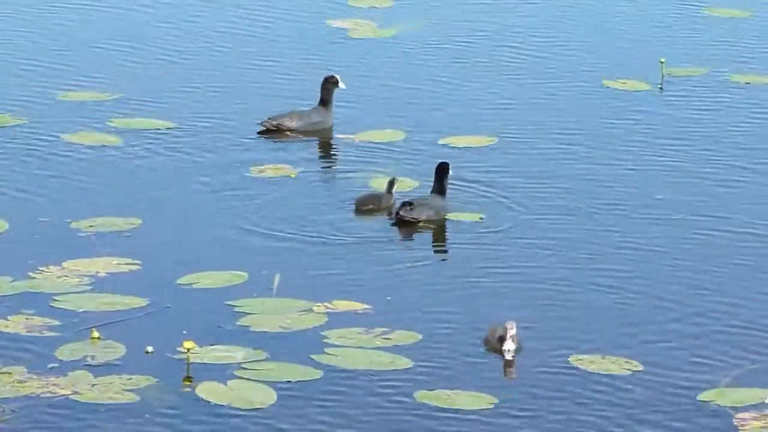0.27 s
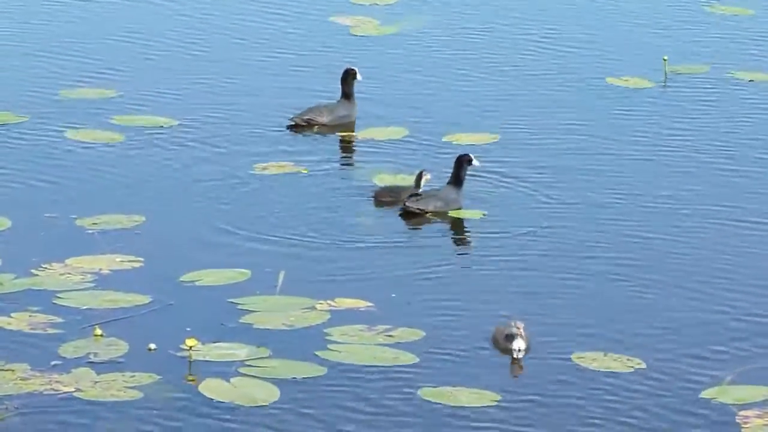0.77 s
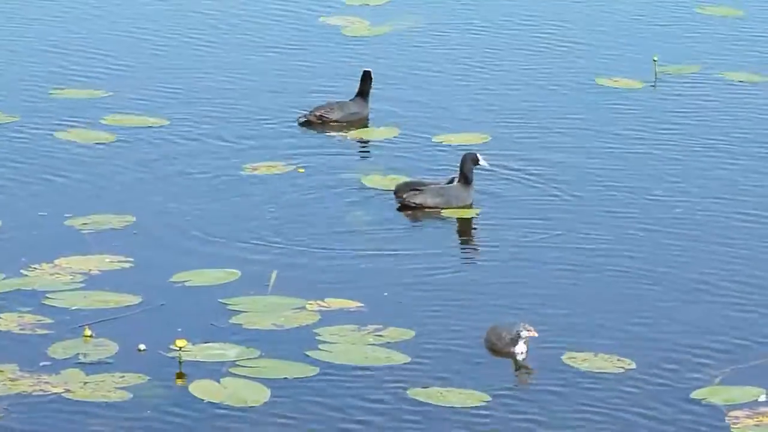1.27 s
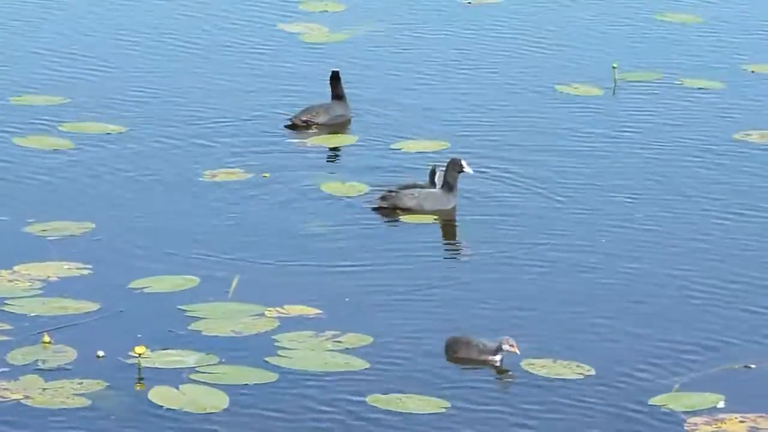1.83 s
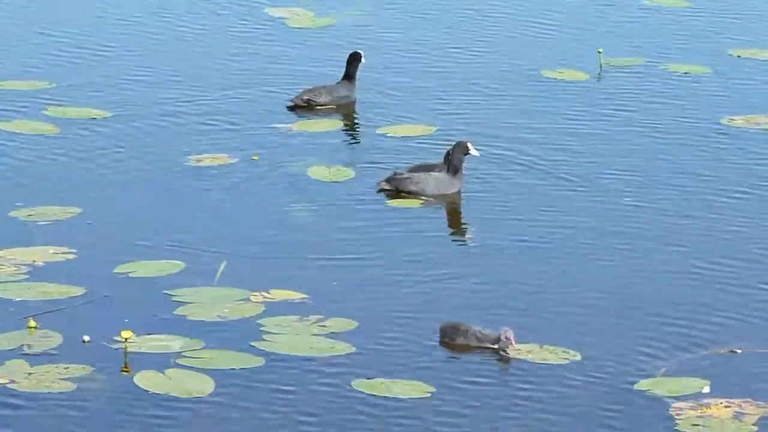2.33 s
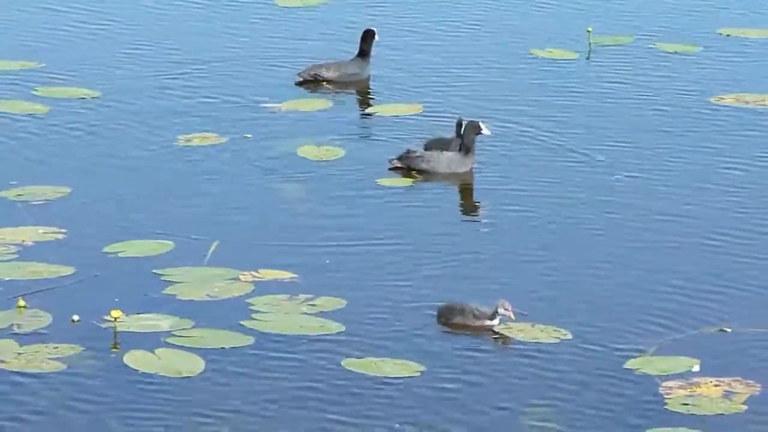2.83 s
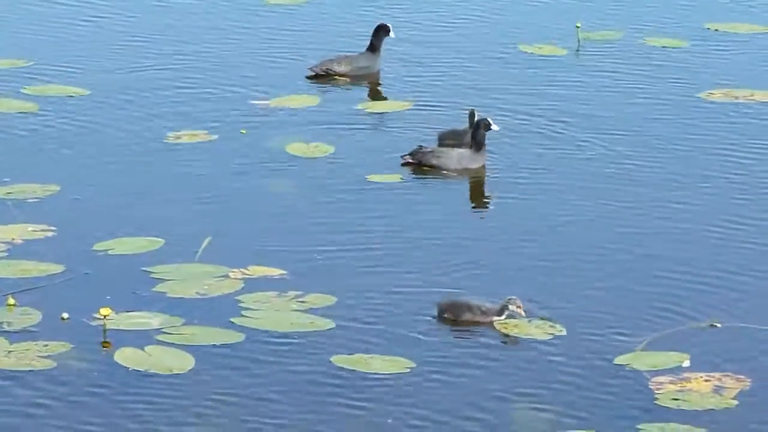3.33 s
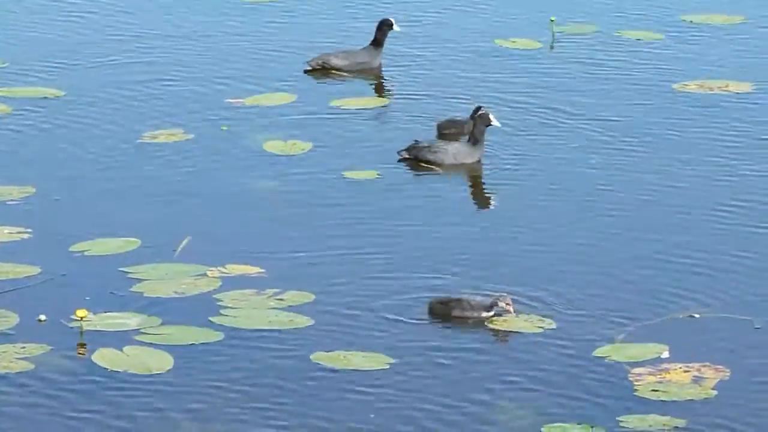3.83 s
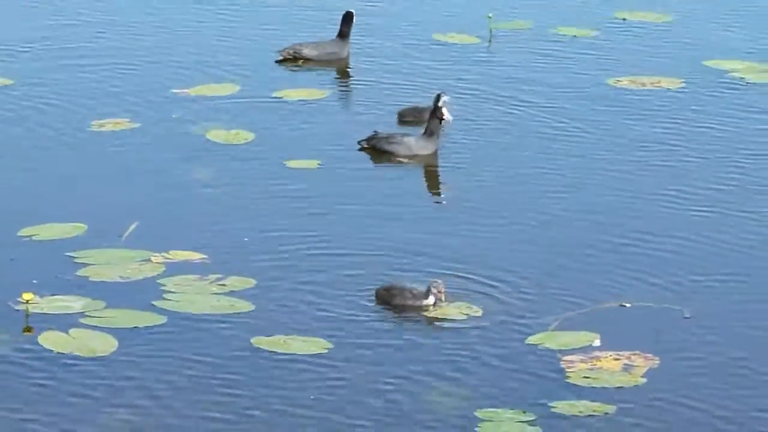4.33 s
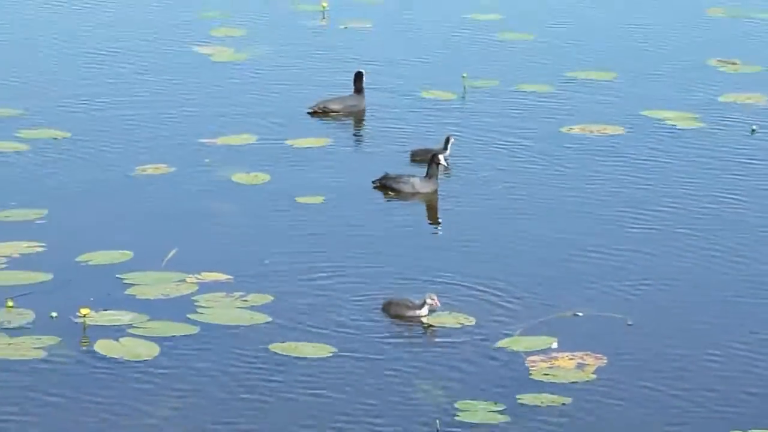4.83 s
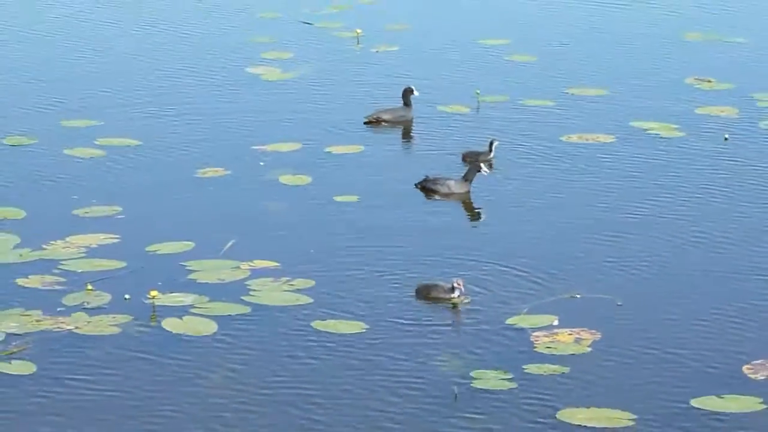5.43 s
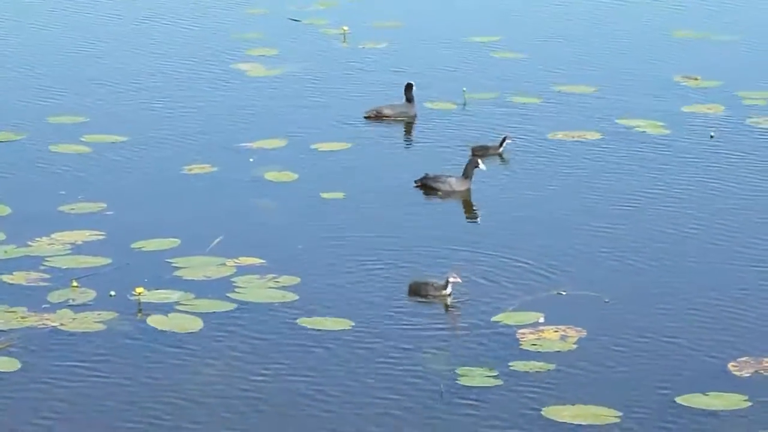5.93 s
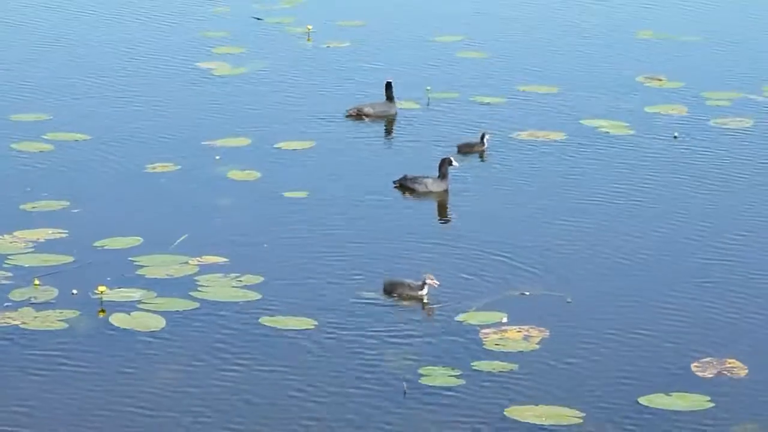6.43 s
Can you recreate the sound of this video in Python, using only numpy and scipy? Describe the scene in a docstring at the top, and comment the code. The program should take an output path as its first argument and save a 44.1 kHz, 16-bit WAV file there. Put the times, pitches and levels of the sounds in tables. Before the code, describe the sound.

Coot chicks beg in thin sliding whistles that break into falling peeps, an adult pips sharply, and wind buffets the microphone over a quiet lake.

```python
"""A family of coots on a lake: an adult gives four sharp pips, octave tones turning brassy, and a faint, pure fifth.
The chicks beg in thin, sliding whistles that break into falling peeps, with faint arched whistles between;
a small songbird nearer the shore chirps once. Gusts and single eddies, shaped noise and short thumps,
buffet the microphone ports at the start and the end. The camera ticks and knocks in the hand as resonant bursts,
and its zoom motor whirs for a second in clicks and rasp. A far engine drones over low rumble and soft hiss."""
import sys
import numpy as np
from scipy import signal
from scipy.fft import rfft, irfft, next_fast_len
from scipy.io import wavfile
from scipy.ndimage import map_coordinates

SR = 44100
rng = np.random.default_rng(int(sys.argv[2]) if len(sys.argv) > 2 else 0)


def dump_mix(stems):
    """Bounce the given channels to the path in sys.argv[1] as a 16-bit WAV at rate SR."""
    frames = np.atleast_2d(stems).T  # one column per channel
    limited = np.clip(frames, -1, 1)  # hard clip at full scale
    pcm = np.round(limited * 32767).astype(np.int16)
    wavfile.write(sys.argv[1], SR, pcm)


N = 295166
TIME = np.arange(N) / SR

# Adult pips. Each row: start in seconds, length in seconds, pitch in Hz, upper voice in dB, lower voice in dB,
# lower voice's entry in seconds, its pitch lift in Hz, upper voice's octave in dB, brightness above the third in dB.
ADULT_PIPS = [(1.691, 0.096, 804, -37, -49, 0.041, -4.5, -13, 1),
              (3.19, 0.082, 791.7, -32.5, -35.5, 0.019, 34.5, -3, -0.5),
              (4.585, 0.097, 791.7, -36, -39, 0.027, 33.5, -5.5, 0),
              (5.44, 0.11, 786, -35, -39, 0.031, 22, 5.5, -4),
              (6.15, 0.055, 805, -54.5, -101, .01, -3.5, -14, -6)]
# Partials of the adult's two voices. Each row: multiple of the pitch, relative level in dB.
UPPER_PARTIALS = [(2, 2), (4, -7), (6, -26), (8, -21.5)]
LOWER_PARTIALS = [(1, -0.5), (3, 0), (4, -11.5), (5, -27), (6, -23.5), (7, -16.5), (8, -11), (9, -12.5)]
PIP_ATTACK_S, PIP_RELEASE_S, PIP_DROOP_HZ = 0.028, 0.039, 13  # the pitch droops as the pip closes
YIELD_DB = -43.5  # above this level the lower voice takes the drive from the upper one
JOIN_S, LOWER_SAG_DB_PER_S = 0.018, 85.5  # the lower voice swells, then sags
LOWER_RELEASE_S, LOWER_STOPS_EARLY_S = 0.028, 0.0063  # and stops before the upper one
LOWER_STIR_DB = -20.5  # the lower voice stirs faintly before it locks in
OCTAVE_SAG_DB_PER_S = 128  # the upper voice mellows as the pip goes on

# Chick calls, a thin whistle that breaks into a falling peep. Each row: start, whistle, climb, break, fall and
# tail in seconds, scoop 0-1, whistle from Hz, to Hz, peep in Hz, bend of the fall (1 is straight), tail's end in Hz,
# bend of the tail, whistle in dB, its swell in dB, its overtone in dB, peep in dB, peep's end in dB, tail's rasp 0-1.
BEGGING_CALLS = [(0, .298, .19, .01, .084, .03, .75, 3540, 3730, 3490, 2.8, 2220, 2, -45.5, 11, -30, -45.3, -47.5, .2),
                 (1.969, .289, .115, .02, .049, .029, .95, 3510, 4200, 3680, 1, 2020, 1.3, -42.5, 4, -36, -41, -43.5, .08),
                 (4.732, .113, .1, .011, .064, .027, 0, 4420, 4600, 4050, 5, 2300, 3, -51, 1.5, -30, -31.3, -36.5, .24),
                 (6.183, .275, .16, .004, .105, .036, .6, 3310, 3470, 3930, 2.9, 2340, 3.2, -58, 7, -12, -34.8, -49.5, .42)]
# A second voice cuts in, beats with the first and roughens it. Each row: start in seconds, length in seconds,
# from Hz, to Hz, from dB, to dB, added rasp 0-1, first voice's loss in dB, first voice's drop in Hz.
SECOND_VOICES = [(0.19, 0.11, 1834, 1872, -61.5, -55.5, 0.1, 1.5, -0.5),
                 (0.294, 0.064, 1829, 1903, -52.5, -57, 0.45, -0.5, 2.5),
                 (2.191, 0.055, 2090, 2130, -59, -66, 0.18, 7, 1.5),
                 (4.884, 0.032, 3150, 2852, -34.5, -40.5, 0.23, 2, 90.5),
                 (6.492, 0.068, 2735, 3000, -63, -50, 0.22, 3.5, 0.5)]
SCOOP, SCOOP_S = 0.36, 0.017  # a whistle at full scoop starts flat by about this share and slides up
OVERSHOOT, OVERSHOOT_AT_S, OVERSHOOT_S = 0.11, 0.0302, 0.035  # then overshoots before it settles
SCOOP_DB = 27  # level lost per share of pitch while the whistle is still flat
CLIMB_ENDS, SWELL_ENDS = 0.845, 0.75  # shares of the whistle after which pitch and level have settled
JUMP_S = 0.0055  # the level jumps as soon as the voice begins to break
THROAT_HZ, THROAT_WIDTH_HZ, FLARE_DB = 3093, 59, 7.5  # the falling peep flares at the throat's resonance
TAIL_LOSS_DB = 6  # the voice weakens as it slips off that resonance
PEEP_OVERTONE_DB, TAIL_OVERTONE_DB = -27.5, -10.5
CHICK_ATTACK_S, CHICK_RELEASE_S = 0.0064, 0.009
CALM_RASP = 0.042  # of one voice alone
BEAT = 0.13  # depth to which the second voice modulates the first
WAVER_DB, WAVER, WAVER_RATE = 1.3, 0.003, 55  # level, share of pitch, knots a second
SPUTTER_DB = 3.5  # scale of the uneven spurts at full rasp

# Faint arched whistles between the calls. Each row: start in seconds, length in seconds, crest after seconds,
# from Hz, crest in Hz, to Hz, level in dB, overtone in dB.
ARCHED_WHISTLES = [(0.397, .112, .042, 2850, 3260, 2600, -59.5, -22),
                   (2.426, .192, .132, 2810, 3190, 2770, -65, -18),
                   (3.04, 0.064, 0.041, 3130, 3210, 3110, -62.5, -19),
                   (4.459, .265, 0.187, 2834, 2993, 2720, -54, -20.5),
                   (6.587, 0.16, .12, 2590, 2846, 2800, -63, -9)]
FALTER_DB, FALTER_RATE = 2.5, 90  # uneven level, knots a second
# A small songbird's high two-step chirp from nearer the shore. Each row: time in seconds, pitch in Hz, level in dB.
SONGBIRD_PATH = [(1.205, 5800, -59), (1.211, 5510, -38), (1.222, 5430, -32), (1.225, 4930, -35.5),
                 (1.244, 4950, -33.5), (1.252, 4910, -37.5), (1.259, 4720, -41.5), (1.264, 4550, -65)]

# Decay of the shore's answer. Each row: frequency in Hz, t60 in seconds.
SHORE_DECAY = [(500, 0.21), (1600, .3), (2400, 0.42), (3500, .47), (5000, 0.49), (10000, 0.17)]
# Colour of the shore's answer. Each row: frequency in Hz, gain in dB.
SHORE_COLOUR = [(800, 5), (1600, -2), (2400, 1.5), (3200, 0), (5500, -11), (9000, -13)]

# Gusts of wind. Each row: start in seconds, hold in seconds, dying time in seconds, relative level in dB,
# left over right in dB, extra deep buffeting in dB.
WIND_GUSTS = [(-.025, .14, 0.043, -31, 6.5, 0.5), (0.17, 0.13, 0.19, -24.5, 0, -1.5),
              (0.707, 0.13, 0.044, -37.5, -0.5, 2.5), (0.866, 0.21, 0.073, -30.5, -3.5, -0.5),
              (1.194, 0.071, 0.023, -32.5, -13, -1.5), (1.573, 0.11, 0.038, -46.5, 6, -3),
              (5.111, 0.077, 0.17, -37.5, -1, 1.5), (5.469, 0.083, 0.035, -38.5, -9.5, 2.5),
              (6.186, 0.32, 0.031, -24.5, 1.5, -2.5), (6.577, 0.034, 0.087, -26, -0.5, -2.5)]
GUST_RISE_S = 0.045
# Deep buffeting, then the finer swirl of strong puffs. Each row: frequency in Hz, relative density in dB.
BUFFET_SPECTRUM = [(15, -18.5), (30, -7), (80, 2), (150, -1), (220, -7), (320, -47), (500, -41),
                   (1200, -63), (2500, -120)]
SWIRL_SPECTRUM = [(60, -33.5), (170, 5), (270, 9.5), (370, 0.5), (520, -22), (900, -26), (2000, -66),
                  (4000, -120)]
# The strongest eddies on the ports. Each row: centre in seconds, level in dB, pitch in Hz, left over right in dB.
PORT_EDDIES = [(.081, -19, 144, 2), (0.107, -17, 156, 9), (0.222, -12.5, 184, 5), (0.246, -16, 175, 2),
               (0.29, -22.5, 250, -5.5), (0.314, -21.5, 130, -5), (0.429, -18, 129, -0.5),
               (0.937, -9.5, 178, 9), (0.975, -19.5, 174, 7), (1.062, -23, 74, -13), (1.25, -20.5, 143, -8),
               (1.625, -30, 59, 3), (6.179, -20, 165, 6), (6.246, -16.5, 207, 5.5), (6.349, -12.5, 181, -3),
               (6.486, -13.5, 215, 2), (6.499, -13.5, 99, 2), (6.607, -13.5, 142, 12),
               (6.635, -19.5, 186, -0.5)]

# Zoom motor. Each row: time in seconds, gear rate in Hz, relative level in dB.
ZOOM_RUN = [(4.31, 106.4, -78), (4.325, 102.5, -58), (4.9, 103, -57.5), (5.285, 100.7, -58.5),
            (5.31, 100.7, -86)]
# Rasp of the gears. Each row: frequency in Hz, relative density in dB.
GEAR_SPECTRUM = [(600, -28), (1500, -12), (2400, -1), (3150, 6.5), (4000, 1.5), (5200, 0.5), (6200, -13),
                 (9000, -18)]
# What a gear click rings with. Each row: frequency in Hz, relative level in dB, t60 in seconds.
LENS_RINGS = [(2330, -11, 0.01), (3320, 2, 0.0048), (4500, -7, .004), (6200, -17, 0.0067)]
# Camera ticks and knocks; the first row is a wind eddy's sharp edge. Each row: start in seconds,
# relative level in dB, centre in Hz, t60 in seconds.
TICKS_AND_KNOCKS = [(0.933, -31, 450, 0.039), (3.369, -34, 2110, .022), (3.498, -30, 2850, 0.016),
                    (3.894, -33.5, 985, .03), (4.034, -36, 1100, 0.033), (4.344, -26, 2620, .014),
                    (4.402, -32, 1170, .018), (4.713, -31.5, 1280, 0.025), (4.980, -34, 1800, 0.011),
                    (5.003, -34.5, 5187, 0.014), (5.829, -32.5, 1810, 0.018), (6.481, -27.5, 650, .033),
                    (6.490, -18, 504, .033), (6.497, -22, 445, 0.025), (6.603, -22, 493, 0.033)]

# Far engine. Each row: time in seconds, firing rate in Hz, relative level in dB.
ENGINE_DRONE = [(0, 98, -85.5), (2, 97.6, -58.5), (3.3, 97.28, -50), (4.2, 96.74, -46), (5.2, 97.25, -52),
                (6.69, 96.18, -40)]
# Harmonics of the engine. Each row: multiple of the firing rate, relative level in dB.
FIRING_HARMONICS = [(1, 0), (2, 3.5), (3, -9), (4, -14.5)]
# Background level. Each row: time in seconds, far rumble in relative dB, hiss in relative dB.
AIR_LEVELS = [(0, -53, -62), (2.5, -53.5, -62.5), (3.8, -52.5, -62), (5, -55.5, -62), (6.4, -52.5, -62.5),
              (6.69, -56.5, -65.5)]
# Far rumble, then soft hiss. Each row: frequency in Hz, relative density in dB.
RUMBLE_SPECTRUM = [(15, -53.5), (25, -20), (65, -14), (81, -4.5), (97, -0.5), (159, -13.5), (175, -13.5),
                   (191, -3.5), (257, -11.5), (297, -11), (515, -17), (2000, -30.5), (2600, -38.5),
                   (4400, -120)]
HISS_SPECTRUM = [(700, -18), (1500, -9.5), (2500, -1), (4000, -1.5), (5500, -3), (7000, -9.5), (9500, -6.5)]
# Stereo width of rumble and hiss. Each row: frequency in Hz, side over mid in dB.
BACKGROUND_WIDTH = [(60, -12), (170, -11.5), (290, -6.5), (490, 1.5), (820, 5.5), (1400, 8.5), (2400, 9),
                    (4000, 6), (6700, 0.5)]

# Treble response of the microphone. Each row: frequency in Hz, gain in dB.
MICROPHONE_RESPONSE = [(7000, 0.5), (7500, -9.5), (7750, -17.5), (8000, -57.5)]
# Image of the treble above half the sampling rate. Each row: frequency in Hz, gain in dB.
MIRROR_RESPONSE = [(8300, -3), (8700, -10.5), (9500, -24.5), (10000, -38.5)]
SAMPLER_HZ, TOP_HZ = 16000, 10050  # the camera's own sampling rate and band limit


def adult(jitter=0.0023, shimmer_db=1.0, bloom=0.16):
    """A pip starts as a pure octave; a lower voice, where strong, locks in under it and makes it brassy."""
    out = np.zeros(N)
    for s, length, hz, upper_db, lower_db, joins, lift_hz, octave_db, bright_db in ADULT_PIPS:
        span, t = during(s, length)
        n = len(span)
        closing = ramp((length - t) / PIP_RELEASE_S)
        stir = amp(LOWER_STIR_DB) * ramp(t / joins)
        locked = np.maximum(ramp((t - joins) / JOIN_S), stir)
        sag = amp(-LOWER_SAG_DB_PER_S * (t - joins))
        lower = locked * sag * ramp((length - LOWER_STOPS_EARLY_S - t) / LOWER_RELEASE_S)
        yielding = np.hypot(1, lower * amp(lower_db - YIELD_DB))
        upper = ramp(t / PIP_ATTACK_S) * closing / yielding
        pitch = hz + lift_hz * lower - PIP_DROOP_HZ * (1 - closing)
        phase = cycle(pitch * (1 + jitter * wobble(400, size=n)))
        mellowing_db = octave_db - OCTAVE_SAG_DB_PER_S * t
        voices = [(upper, upper_db, UPPER_PARTIALS, np.sin, mellowing_db),
                  (lower, lower_db, LOWER_PARTIALS, np.cos, 0)]
        for effort, level_db, partials, wave, fourth_db in voices:
            for k, db in partials:
                high = k > 3
                # the higher overtones bloom only at full effort
                colour = amp(fourth_db * (k == 4) + bright_db * high) * effort ** (bloom * high)
                level = amp(level_db + db + shimmer_db * wobble(141, size=n))
                out[span] += np.sqrt(2) * effort * colour * level * wave(k * phase)
    return out


def second_voice():
    """A chick's second voice, with the strain, loss, drop and beating it imposes on the first."""
    out, strain = np.zeros(N), np.full(N, CALM_RASP)
    loss_db, drop_hz, second_hz, coupling = np.zeros((4, N))
    for s, length, from_hz, to_hz, from_db, to_db, rasp, takes_db, drags_hz in SECOND_VOICES:
        span, t = during(s, length)
        gate, u = chick_gate(t, length), t / length
        strain[span] += rasp * gate
        loss_db[span] += takes_db * gate
        drop_hz[span] += drags_hz * gate
        coupling[span] += BEAT * gate
        second_hz[span] = from_hz + (to_hz - from_hz) * u
        gain = gate * amp(from_db + (to_db - from_db) * u)
        out[span] += whistle(second_hz[span], gain, strain[span], PEEP_OVERTONE_DB)
    return out, strain, loss_db, drop_hz, second_hz, coupling


def chicks():
    """Each call climbs and swells, then breaks into a peep that falls, flares and frays, roughened by a second voice."""
    out, strain, loss_db, drop_hz, second_hz, coupling = second_voice()
    for (s, whistle_s, climb_s, break_s, fall_s, tail_s, scoop, from_hz, to_hz, peep_hz, bend, tail_hz,
         tail_bend, whistle_db, swell_db, overtone_db, peep_db, end_db, tail_rasp) in BEGGING_CALLS:
        length = whistle_s + fall_s + tail_s
        span, t = during(s, length)
        swell = ramp(t / whistle_s / SWELL_ENDS)
        fall = np.clip((t - whistle_s) / fall_s, 0, 1)
        slip = 1 - np.clip((length - t) / tail_s, 0, 1) ** tail_bend

        # pitch: scoop, overshoot and climb, then the break into the falling peep
        climb = ramp(1 + (t - CLIMB_ENDS * whistle_s) / climb_s)
        overshoot = OVERSHOOT * np.exp(-((t - OVERSHOOT_AT_S) / OVERSHOOT_S) ** 2)
        settle = overshoot - SCOOP * np.exp(-(t / SCOOP_S) ** 2)
        whistled = (from_hz + (to_hz - from_hz) * climb) * (1 + scoop * settle)
        peep = peep_hz + (THROAT_HZ - peep_hz) * fall ** bend + (tail_hz - THROAT_HZ) * slip
        broken = ramp((t - whistle_s) / break_s + 0.5)
        hz = (1 - broken) * whistled + broken * peep - drop_hz[span]

        # level and overtone: the whistle's, then the peep's
        loud = ramp((t - whistle_s + break_s / 2) / JUMP_S)
        flat_loss_db = SCOOP_DB * scoop * SCOOP * np.exp(-t / OVERSHOOT_S)
        whistled_db = whistle_db - swell_db * (1 - swell) - flat_loss_db
        flare_db = FLARE_DB / (1 + ((peep - THROAT_HZ) / THROAT_WIDTH_HZ) ** 2)
        peeped_db = peep_db + (end_db - peep_db) * fall + flare_db - TAIL_LOSS_DB * slip
        db = (1 - loud) * whistled_db + loud * peeped_db
        peep_bright_db = PEEP_OVERTONE_DB + (TAIL_OVERTONE_DB - PEEP_OVERTONE_DB) * slip
        bright_db = (1 - loud) * overtone_db + loud * peep_bright_db

        beating = 1 + coupling[span] * np.sin(cycle(hz - second_hz[span]))
        rasp = np.maximum(strain[span], tail_rasp * fall ** 2)
        gain = chick_gate(t, length) * beating * amp(db - loss_db[span])
        out[span] += whistle(hz, gain, rasp, bright_db)
    return out


def thin_whistles(fade_s=0.027):
    """Between calls a chick whistles faintly and falteringly: the pitch rises to a crest and sinks."""
    out = np.zeros(N)
    for s, length, crest_s, from_hz, crest_hz, to_hz, db, overtone_db in ARCHED_WHISTLES:
        span, t = during(s, length)
        sinking = np.clip((t - crest_s) / (length - crest_s), 0, 1) ** 1.5
        hz = from_hz + (crest_hz - from_hz) * ramp(t / crest_s) + (to_hz - crest_hz) * sinking
        faltering = amp(db + FALTER_DB * wobble(FALTER_RATE, size=len(span)))
        gain = faltering * ramp(t / fade_s) * ramp((length - t) / fade_s)
        out[span] += whistle(hz, gain, CALM_RASP, overtone_db)
    return out


def songbird(rasp=0.057):
    """A small songbird's short high chirp, a nearly pure tone that steps down in the middle."""
    start, end = SONGBIRD_PATH[0][0], SONGBIRD_PATH[-1][0]
    span, _ = during(start, end - start)
    hz, db = steady(SONGBIRD_PATH)
    out = np.zeros(N)
    out[span] = whistle(hz[span], amp(db[span]), rasp, PEEP_OVERTONE_DB)
    return out


def whistle(hz, gain, rasp, overtone_db, jitter=0.0007, shimmer_db=0.75, rasp_hz=2600, swing=0.125,
            flutter_hz=700, spurt_rate=330):
    """A nearly pure tone; under strain the membrane flutters and rasps in uneven spurts."""
    n = len(hz)
    rasp = np.clip(rasp, 0, 1)
    spurts_db = SPUTTER_DB * rasp * (wobble(spurt_rate, size=n) - rasp)
    gain = gain * amp(WAVER_DB * wobble(WAVER_RATE, size=n) + spurts_db)
    hz = hz * (1 + WAVER * wobble(WAVER_RATE, size=n))
    unsteady = jitter * wobble(250, size=n) + swing * rasp * wobble(rasp_hz, size=n)
    phase = cycle(hz * (1 + unsteady))
    flutter = np.sin(cycle(flutter_hz * (1 + 0.36 * wobble(flutter_hz, size=n))))
    tone = np.sin(phase) + amp(overtone_db) * np.sin(2 * phase)
    return np.sqrt(2) * gain * amp(shimmer_db * wobble(160, size=n)) * (1 + rasp * flutter) * tone


def chick_gate(t, length):
    """Attack, hold and release of a chick's voice."""
    return ramp(t / CHICK_ATTACK_S) * ramp((length - t) / CHICK_RELEASE_S)


def lake(x, tail_db, delay_s=0.014, lead_s=0.000012):
    """The birds sit just left of centre; the shore returns a faint diffuse tail of decaying noise."""
    hz, t, z = signal.stft(rng.standard_normal((2, SR // 2)), SR, nperseg=256)
    decay = amp(-60 * t / along(SHORE_DECAY, hz)[:, None])
    tail = signal.istft(z * decay, SR, nperseg=256)[1]
    late = filtered(x, lambda f: amp(along(SHORE_COLOUR, f)) * np.exp(-2j * np.pi * f * delay_s))
    wet = signal.fftconvolve(late[None], tail / np.linalg.norm(tail[0]), axes=1)[:, :N]
    # the left channel leads the right by lead_s
    direct = filtered(x, lambda f: np.exp(1j * np.pi * f * lead_s * np.array([[1], [-1]])))
    return panned(direct, pan_db=0.6) + amp(tail_db) * wet


def wind(buffet_db=-1, swirl_db=14, lumps_db=3.0):
    """Puffs buffet each port on its own; the finer swirl grows with the square of their strength."""
    power, deep = np.zeros((2, 2, N))
    for s, hold, dying, db, pan_db, deep_db in WIND_GUSTS:
        puff = panned(amp(db) * gust(s, hold, dying), pan_db)
        power += puff ** 2
        deep += (amp(deep_db) * puff) ** 2
    lumps = unit(amp(lumps_db * np.array([wobble(60), wobble(60)])))
    buffeting = amp(buffet_db) * np.sqrt(deep) * rush(BUFFET_SPECTRUM, side_db=1.0)
    swirl = amp(swirl_db) * power * rush(SWIRL_SPECTRUM, side_db=1.5)
    return lumps * (buffeting + swirl)


def gust(s, hold, dying):
    """A gust rises quickly, holds and dies away."""
    return ramp((TIME - s) / GUST_RISE_S) * np.exp(-np.maximum(TIME - s - hold, 0) / dying)


def eddies(cycles=0.79, steepen=0.32):
    """A single eddy is a thump of a cycle or two that reaches the ports at unlike phases."""
    out = np.zeros((2, N))
    for s, db, hz, pan_db in PORT_EDDIES:
        turns = (TIME - s) * hz
        span = np.flatnonzero(abs(turns) < 10)
        swell = 1 / np.cosh(2 * turns[span] / cycles)
        phase = 2 * np.pi * turns[span] + rng.normal(0, 1.0, (2, 1))
        # a second harmonic steepens the wave where it is strongest
        wave = np.cos(phase) + steepen * swell * np.sin(2 * phase)
        out[:, span] += panned(amp(db) * swell * wave, pan_db)
    return out


def zoom_motor(motor_db=-1.3, click_db=3, fade_db=23):
    """The lens gears click once a turn, ringing the barrel mostly at the right port, and rasp in between."""
    hz, db = steady(ZOOM_RUN)
    turn = cycle(hz) / (2 * np.pi) % 1
    catches = np.diff(turn, prepend=0) < 0
    t = TIME[:SR // 50]
    ring = np.zeros(N)
    for f, level_db, t60 in LENS_RINGS:
        strikes = catches * amp(level_db + 1.6 * wobble(100))
        ringing = amp(-60 * t / t60) * np.sin(2 * np.pi * f * t)
        ring += signal.fftconvolve(strikes, ringing)[:N]
    clicks = panned(amp(click_db) * unit(ring), pan_db=-35)
    # the rasp fades within each turn
    rasp = unit(amp(-fade_db * turn)) * rush(GEAR_SPECTRUM, side_db=-7.0)
    running = (TIME > ZOOM_RUN[0][0]) & (TIME < ZOOM_RUN[-1][0])
    return running * amp(db + motor_db) * (clicks + rasp)


def ticks_and_knocks(tick_db=-6, soft=0.74):
    """Small dry sounds, the first an eddy's sharp edge: a brief burst through one broad resonance, duller when low."""
    out, t = np.zeros((2, N + SR)), np.arange(SR // 20) / SR
    for s, db, hz, t60 in TICKS_AND_KNOCKS:
        dulling = signal.butter(1, soft * hz, fs=SR)
        noise = signal.lfilter(*dulling, rng.standard_normal((2, len(t))))
        burst = unit(signal.lfilter(*signal.iirpeak(hz, 1, fs=SR), noise))
        out[:, round(s * SR):][:, :len(t)] += amp(db + tick_db - 60 * t / t60) * burst
    return out[:, :N]


def distance(rumble_db=7, hiss_db=10.0, hum_db=-1, fading_db=2):
    """A far engine whose lines fade in the moving air, over a low rumble and a soft hiss."""
    far_db, air_db = steady(AIR_LEVELS)
    hz, engine_db = steady(ENGINE_DRONE)
    phase = cycle(hz * (1 + 0.0047 * wobble(6)))
    hum = np.zeros(N)
    for k, db in FIRING_HARMONICS:
        hum += amp(db + fading_db * wobble(9.1)) * np.sin(k * phase + 0.37 * wobble(8))
    rumble = amp(far_db + rumble_db + 0.42 * wobble(6.2)) * open_air(RUMBLE_SPECTRUM)
    hiss = amp(air_db + hiss_db) * open_air(HISS_SPECTRUM)
    return amp(engine_db + hum_db) * unit(hum) + rumble + hiss


def open_air(spectrum):
    """Background noise of rms 1: narrow in the bass, very wide in the treble."""
    mid, side = filtered(rng.standard_normal((2, N)), lambda hz: amp(along(spectrum, hz)))
    side = filtered(side, lambda hz: amp(along(BACKGROUND_WIDTH, hz)))
    return unit(np.array([mid + side, mid - side]))


def rush(spectrum, side_db):
    """Stereo noise of rms 1; side_db sets its width."""
    mid, side = filtered(rng.standard_normal((2, N)), lambda hz: amp(along(spectrum, hz)))
    side = amp(side_db) * side
    return unit(np.array([mid + side, mid - side]))


def panned(x, pan_db):
    """Place a sound by its left-right level difference, at equal power."""
    gains = amp(np.array([[pan_db], [-pan_db]]) / 2)
    return x * gains / np.sqrt(np.mean(gains ** 2, axis=0))


def filtered(x, response):
    """Shape x with a response of frequency."""
    m = next_fast_len(N + SR // 2)
    return irfft(rfft(x, m) * response(np.fft.rfftfreq(m, 1 / SR)), m)[..., :N]


def wobble(rate, size=N):
    """A smooth random curve, rate knots a second."""
    knots = rng.standard_normal(int(size * rate / SR) + 4)
    return map_coordinates(knots, [np.arange(size) * rate / SR])


def cycle(hz):
    """Running phase in radians of a changing frequency."""
    return 2 * np.pi * np.cumsum(hz) / SR


def ramp(u):
    """A smooth step from 0 to 1 as u goes from 0 to 1."""
    return np.sin(np.pi / 2 * np.clip(u, 0, 1)) ** 2


def during(start, length):
    """The samples of an event and the time since its start."""
    span = np.flatnonzero((TIME >= start) & (TIME < start + length))
    return span, TIME[span] - start


def steady(rows):
    """Each column drawn as a line over the whole scene."""
    s, *cols = np.transpose(rows)
    return [np.interp(TIME, s, c) for c in cols]


def along(points, hz):
    """Read a curve of (Hz, value) points on a log frequency axis."""
    f, v = np.transpose(points)
    return np.interp(np.log(hz + 1), np.log(f + 1), v)


def amp(db):
    """Decibels to gain."""
    return 10 ** (np.asarray(db) / 20)


def unit(x):
    """Scale to rms 1."""
    return x / np.sqrt(np.mean(x ** 2) + 1e-20)


def scene():
    """Birds on the water and near the shore, the wind and the noises at the camera, and the far background."""
    birds = lake(adult(), tail_db=-13.5)
    birds += lake(chicks() + thin_whistles(), tail_db=-19.0)
    birds += lake(songbird(), tail_db=-11.0)
    return birds + wind() + eddies() + zoom_motor() + ticks_and_knocks() + distance()


def record(dry):
    """The camera samples slowly: it dulls the top treble, mirrors it faintly upward and stops at its band limit."""
    kept = filtered(dry, lambda hz: amp(along(MICROPHONE_RESPONSE, hz)) * (hz < SAMPLER_HZ / 2))
    mirrored = 2 * kept * np.cos(2 * np.pi * SAMPLER_HZ * TIME)
    image = filtered(mirrored, lambda hz: amp(along(MIRROR_RESPONSE, hz)))
    return filtered(kept + image, lambda hz: hz < TOP_HZ)


dry = scene()
out = record(dry)
dump_mix(out)
```